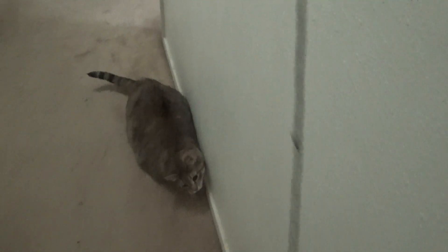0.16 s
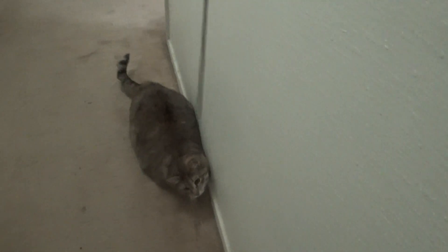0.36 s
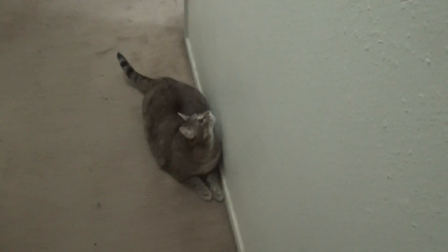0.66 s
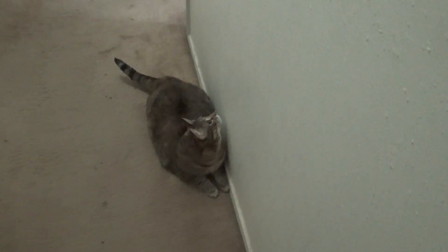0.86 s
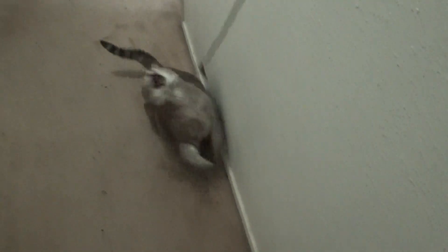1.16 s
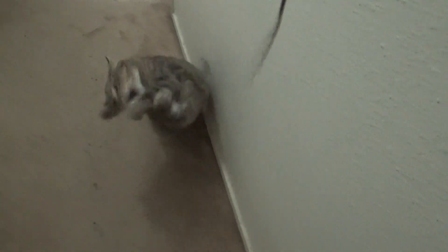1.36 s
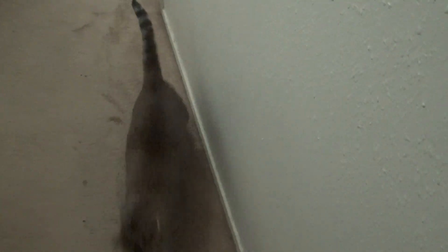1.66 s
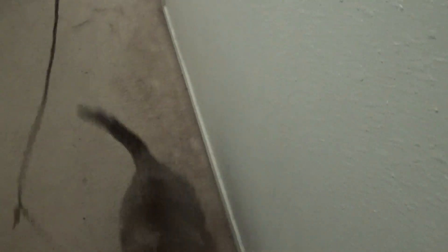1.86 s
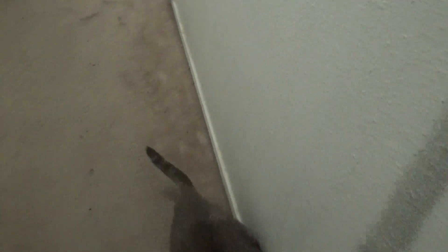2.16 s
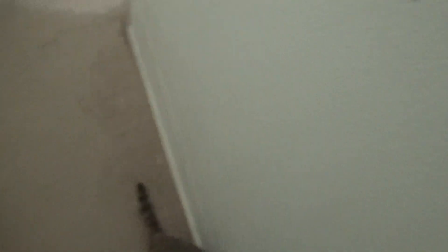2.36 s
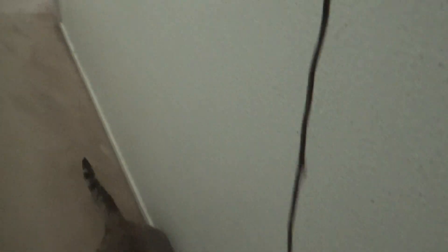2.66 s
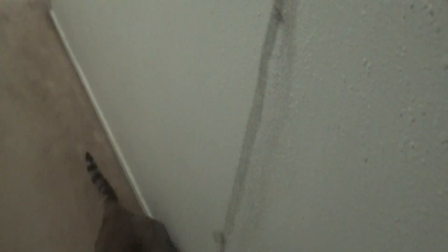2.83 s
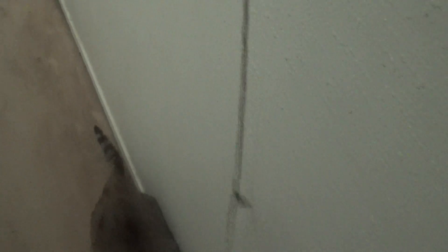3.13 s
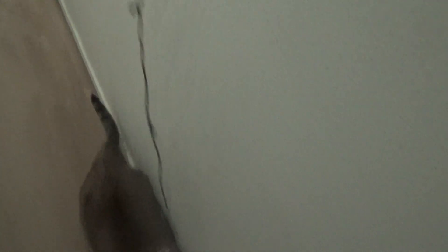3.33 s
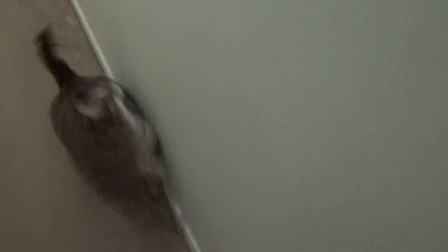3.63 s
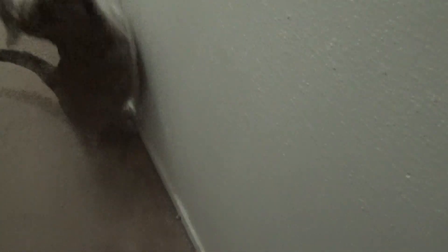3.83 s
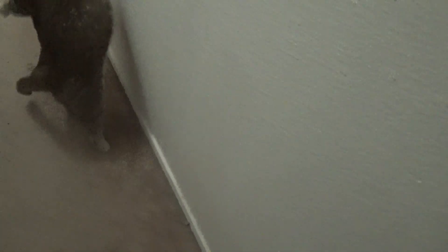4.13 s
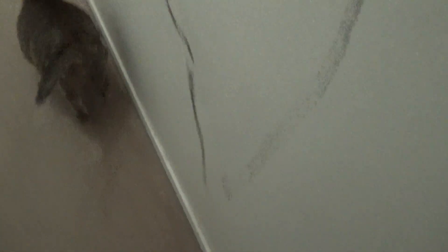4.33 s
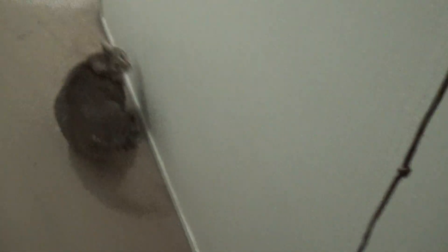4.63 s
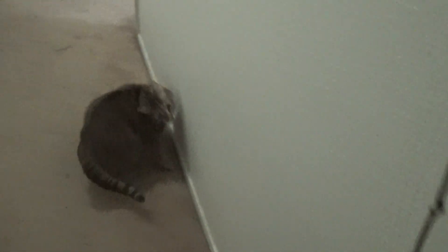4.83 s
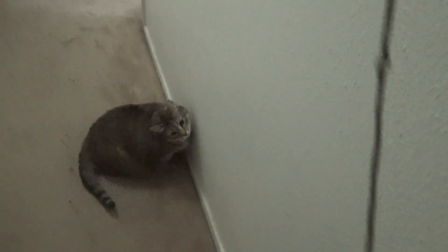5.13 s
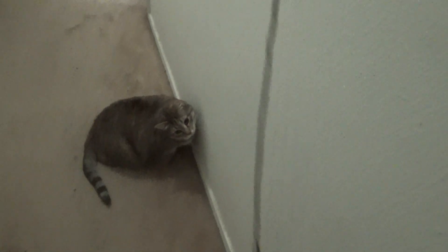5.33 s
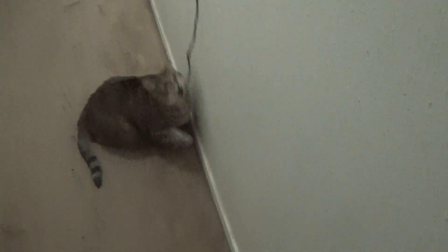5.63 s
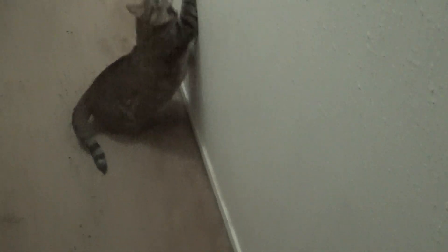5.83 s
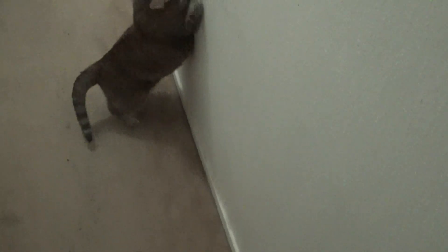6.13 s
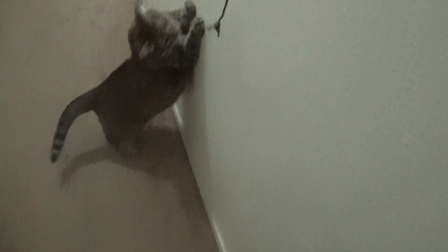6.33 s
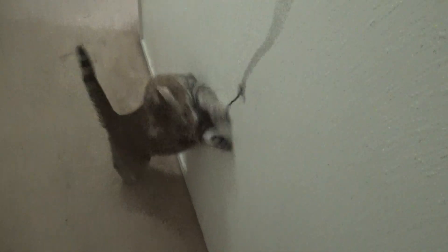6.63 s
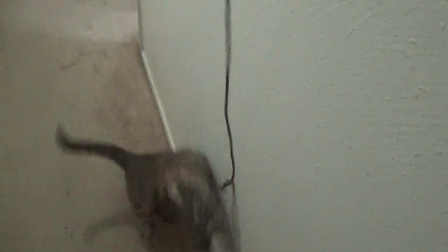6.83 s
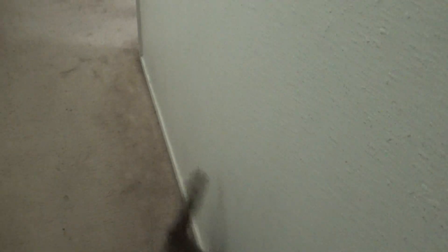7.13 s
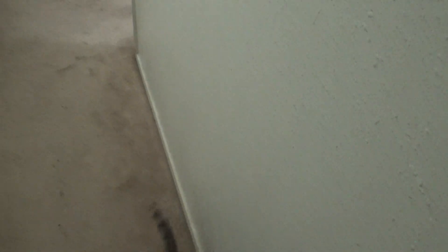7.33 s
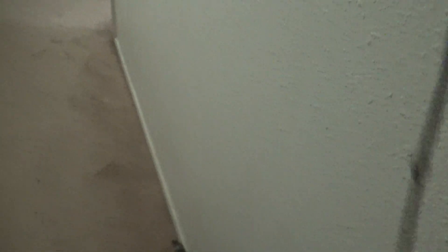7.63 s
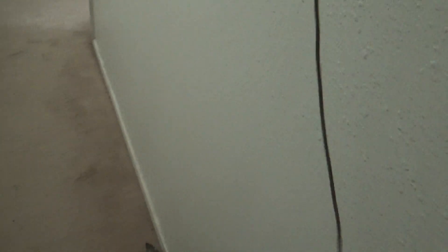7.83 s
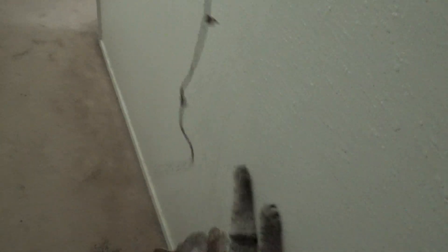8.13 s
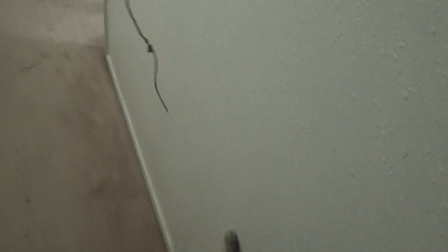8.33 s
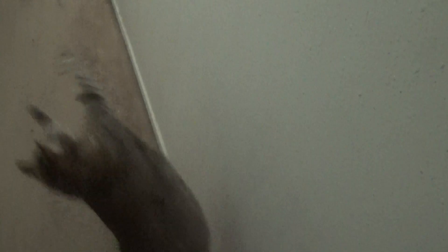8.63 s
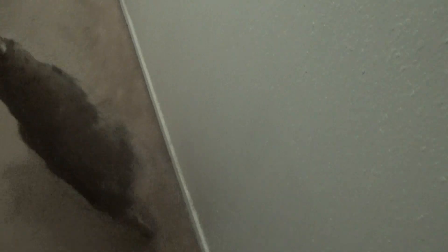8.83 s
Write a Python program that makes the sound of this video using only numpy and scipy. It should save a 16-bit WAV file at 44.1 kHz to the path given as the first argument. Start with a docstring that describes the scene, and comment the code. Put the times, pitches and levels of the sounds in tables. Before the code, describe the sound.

A steady soft draught, hiss and faint low mains hum fill a carpeted hallway, heard close in stereo. At 0.3 s a cord swishes barely audibly; around 1.1-2.0 s come faint fur rustles, a short breathy huff at 1.3, a soft step and claw ticks. A tap at 2.25 leads to a very sharp double slap on the hollow wall at 2.75 with a floor thump, then gritty scraping and scrabbling until 3.6. A heavy dull landing booms at 3.75, followed by brushing and smaller taps to 4.4. Quiet returns, with a faint rub and cord swish. A loud crisp slap hits at 5.84, then jerky scrapes, rustles and soft thuds until 7.0. After a lull, a swish at 7.8 precedes a hard smack and deep thump at 8.12, a lighter slap at 8.34, a dry claw click at 8.53, and a last fur brush and thud near 8.9.

```python
"""A cat pounces at a dangling cord in a carpeted hallway, close by, over a steady draught, mains hum and
hiss that last throughout. Noise excites damped resonances: paws slap and scrape the hollow wall, claws
tick, landings drum the floor boards, fur and cord brush, and the cat huffs once. The hallway answers with
a short tail of noise that decays at its own speed at each frequency.
"""
import sys
import numpy as np
from scipy import signal
from scipy.fft import rfft, irfft, next_fast_len
from scipy.io import wavfile
from scipy.ndimage import map_coordinates

SR = 44100
rng = np.random.default_rng(int(sys.argv[2]) if len(sys.argv) > 2 else 0)


def unload_wav(signal):
    """Save mono or channel-first audio to the path in sys.argv[1] as 16-bit WAV at rate SR, clipped to [-1, 1]."""
    wavfile.write(
        sys.argv[1],
        SR,
        np.round(np.clip(np.atleast_2d(signal).T, -1, 1) * 32767).astype(np.int16),
    )


N = 396018  # samples

# Spectral shape of draught and hiss: [f/Hz, relative level/dB per Hz]
AIR_SPECTRUM = [(13, -60), (22, 3.5), (125, -2), (169, -2.5), (263, -4), (444, -8), (672, -8.5), (910, -7),
                (1230, -11.5), (5460, -19), (9220, -16), (14700, -29), (16000, -31)]
# Left-right correlation of that noise before the stereo width is set: [f/Hz, correlation]
AIR_LIKENESS = [(60, 0.38), (240, 0.31), (950, 0.2), (3770, 0.76), (15000, 1)]
# Mains hum: [f/Hz, mid level/dB rms]
HUM = [(120, -68), (240, -81.5)]
# Fuzzy background bands that come and go: [f/Hz, width/Hz, relative level/dB]
FLICKER_BANDS = [(693, 200, 0), (920, 200, -1.5)]
# Paw slaps and claw taps: [t/s, body peak level/dB, bright part/dB and hollow part/dB re body, favoured f/Hz]
TAPS = [(0.212, -46, -15, -8, 1100), (1.336, -57, 16.5, -12, 3500), (1.631, -44.5, 4.5, -21, 3500),
        (2.252, -30.5, -1.5, -3, 3570), (2.4377, -35, -11, -7, 2670), (2.5113, -42.5, 5.5, -4, 1530),
        (2.628, -52.5, 9.5, -7, 2010), (2.7285, -39, -8, -11, 4040), (2.7443, -11.5, -17.5, -6.5, 2200),
        (2.7549, -17, -12, -5, 3400), (2.866, -30, -21, -16, 2980), (2.9388, -27.5, -6, -10, 2880),
        (3.5271, -37, -25, -12, 1946), (3.6305, -50, 3, 12, 1670), (3.7506, -38.5, -1, 11.5, 1610),
        (4.095, -28, -14, -6.5, 2570), (4.154, -36.5, -2, -10, 2380), (4.2351, -28, -9, -7.5, 2820),
        (4.4405, -45, -2, -8, 2060), (4.943, -44.5, 8, -16, 1600), (4.967, -45.5, 5, -3, 2000),
        (5.8369, -11, -18.5, -7, 2380), (5.8452, -12.5, -9, -5.5, 2070), (5.8603, -46, -11, -4, 2880),
        (6.9707, -46.5, 13.5, -5, 2480), (7.0204, -48.5, 8, 1, 1800), (7.0814, -36, -2.5, -1.5, 1900),
        (7.2677, -50.5, 1, 12.5, 1500), (7.929, -49, -8, 5.5, 1400), (8.1184, -14, -10, -10, 1810),
        (8.1284, -14, -33, -12, 4130), (8.3317, -32, -13, -8, 2410), (8.348, -28.5, -11, -29, 3180),
        (8.834, -37, 5.5, -6, 2170), (8.939, -50, 5, 8.5, 1500)]
# Painted wall under a paw: [f/Hz, width/Hz, level/dB]
WALL_MODES = [(1303, 330, 3), (1740, 300, 3), (2230, 650, -1), (2710, 320, 4), (3200, 530, -2),
              (4170, 320, 2), (4500, 3000, -5.5)]
# Hollow behind the wall: [f/Hz, width/Hz, level/dB]
HOLLOW_MODES = [(412, 240, -2.5), (714, 296, 1), (930, 425, -0.5)]
# Fur, cord and claw tips: [f/Hz, width/Hz, level/dB]
BRUSH_MODES = [(4100, 3900, -3), (7080, 780, 2), (8840, 1840, 1), (13000, 4800, -22)]
# Broad treble emphasis that follows the brush modes: [f/Hz, width/Hz, level/dB]
SOFT_MODES = [(7170, 6400, 0)]
# Decay of the hallway's answer: [f/Hz, t60/s]
HALL_DECAY = [(100, 0.54), (500, 0.34), (2000, 0.24), (10000, 0.2)]
# Cord swinging past: [start t/s, length/s, level/dB]
SWISHES = [(0.301, 0.36, -60.5), (1.42, 0.2, -61), (5.293, 0.39, -61), (7.754, 0.38, -53.5)]
# Paws dragging over wall (high f) and carpet (low f):
# [start t/s, length/s, loudest at share 0-1, scrape level/dB, favoured f/Hz, fur brush level/dB]
STROKES = [(1.075, 0.13, 0.3, -62.5, 2740, -60.5), (1.586, 0.2, 0.3, -66, 2700, -55.5),
           (1.856, 0.062, 0.44, -65, 1500, -62), (1.985, 0.031, 0.54, -60.5, 2020, -56),
           (2.403, 0.34, 0.17, -64.5, 2520, -70), (2.767, 0.32, 0, -46, 2930, -51.5),
           (2.987, 0.32, 0.63, -49, 2600, -55.5), (3.151, 0.071, 0.5, -43.5, 3000, -73),
           (3.203, 0.083, 0.86, -52, 2900, -57.5), (3.31, 0.19, 0.06, -61, 2800, -61.5),
           (3.397, 0.077, 0.57, -52, 2780, -63), (3.522, 0.05, 0.46, -50, 3600, -59.5),
           (3.55, 0.062, 0.4, -52, 3300, -58), (3.657, 0.32, 0.55, -57.5, 1930, -54.5),
           (3.86, 0.27, 0.45, -51.5, 1580, -51), (4.102, 0.28, 0.28, -60, 1490, -58.5),
           (4.34, 0.068, 0.1, -63, 2650, -57.5), (4.721, 0.37, 0.48, -62, 1480, -59),
           (5.882, 0.15, 0.2, -53.5, 1520, -54.5), (6.023, 0.13, 0, -47.5, 2675, -53),
           (6.051, 0.027, 0, -44.5, 2770, -71), (6.229, 0.18, 0.23, -46.5, 2640, -57),
           (6.351, 0.089, 0.67, -48, 2570, -54.5), (6.482, 0.11, 0.48, -43.5, 2880, -45),
           (6.6, 0.41, 0.08, -59.5, 2460, -54), (6.664, 0.056, 0.95, -47.5, 2630, -48.5),
           (6.802, 0.083, 0.3, -64, 1600, -58), (7.162, 0.036, 0.5, -59.5, 1280, -62.5),
           (8.137, 0.11, 0, -43.5, 2960, -48), (8.337, 0.087, 0.14, -44, 3150, -47.5),
           (8.593, 0.16, 0.23, -67, 2900, -64), (8.795, 0.048, 0.4, -59.5, 2470, -51.5),
           (8.834, 0.056, 0.4, -56.5, 2250, -42.5), (8.923, 0.056, 0.44, -61, 1500, -52)]
# The cat's short breathy huff: [start t/s, length/s, level/dB]
HUFF = (1.27, 0.23, -54)
# Resonances of its mouth: [f/Hz, width/Hz, level/dB]
MOUTH_MODES = [(332, 40, 2.5), (673, 64, -3.5), (960, 120, -4), (3240, 910, -10.5), (3600, 150, -8),
               (6450, 1400, -15)]
# Landings and heavy steps: [t/s, low-mode peak level/dB, upper modes/dB re low modes]
THUMPS = [(1.671, -44, -4.5), (1.879, -59.5, 10), (2.252, -53, 16.5), (2.438, -48, 0), (2.509, -48, -1),
          (2.75, -25.5, -0.5), (2.851, -37, -16), (2.945, -40.5, -3), (3.127, -38.5, -12),
          (3.195, -41.5, -5), (3.752, -21.5, -4.5), (4.075, -43.5, -1), (4.267, -42, -4), (4.509, -56, 4),
          (5.838, -39, 8.5), (6.05, -41, -4), (6.276, -52, 1), (6.379, -50, 4), (6.571, -40, 1),
          (6.648, -35.5, -6.5), (6.82, -45.5, -1.5), (7.017, -43.5, 0), (7.268, -58.5, 15.5),
          (7.909, -54.5, 7.5), (8.119, -17.5, -2.5), (8.344, -53, 0), (8.936, -31, 4)]
# Floor boards and wall panel, three groups: [f/Hz, width/Hz, level/dB]
DEEP_MODES = [(52, 24, -14.5), (89.6, 14, 1), (110, 17, -4), (125.3, 12.3, 0.5)]
LOW_MODES = [(159.1, 37.7, 0), (199.2, 25.6, 0.5)]
UPPER_MODES = [(230, 45, -1.5), (281, 26, 2.5), (340, 17, -2.5), (418, 40, -4), (470, 33, -4),
               (588, 38, -5.5)]
# Dry clicks of a single claw tip: [t/s, body peak level/dB, bright part/dB re body, favoured f/Hz]
TICKS = [(1.752, -45, 13.5, 3080), (1.765, -56, 13, 3000), (1.99, -45, 1, 2000), (2.017, -36, 5.5, 3030),
         (2.42, -49, -3, 2000), (7.951, -49, 14, 3000), (8.532, -24, -12, 3300), (8.635, -51, 7, 3000),
         (8.665, -57, 16, 3320)]
# Where the cat is: [t/s, left-right level/dB, deep modes of the floor there/dB re low modes]
PLACE = [(1.4, 1, -3), (2.3, -1, -20), (2.75, -1, 0), (3.0, -1, -19), (3.75, 1.5, -6.5), (4.5, 1, -22),
         (5.8, 1.5, 1.5), (6.8, -1, -1.5), (7.3, 2, -9), (8.1, -1.5, -12), (8.5, -2, 6), (8.9, 2.5, -14)]
# Gain on the left-right difference: [f/Hz, gain/dB]
DIFFERENCE_GAIN = [(40, -24), (150, -16), (400, -1.5), (9000, 5), (11500, -12.5)]

AIR_DB, FLICKER_DB = -58, -71.0
SWISH_TOP = 0.56  # share of the swing at which it is loudest
# The hollow part has this level under a scrape of -49.5 dB at 2700 Hz and follows the scrape's level
HOLLOW_DB, HOLLOW_DB_PER_DB, HOLLOW_DB_PER_OCTAVE = -52.5, 0.78, -3
RUMBLE_DB = -3.5  # shudder of the boards relative to the hollow part
SNAGS_PER_S, SNAG_DB = 110, 17.5  # claws catching within a stroke
JERK_DB, JERKS_PER_S = 1.03, 67.2  # a stroke moves in jerks
PUSH_S = 0.038  # time scale of the paws' pressing
SETTLE_S, SETTLE_SHARE = 0.01836, 1.13  # delay and strength of the body's weight following the paws
TICK_T60_S = 0.0095
TOP_HZ = 15900  # band limit of the camera


def amp(db):
    """Decibel law: amplitude gain of a level in dB."""
    return 10 ** (np.asarray(db) / 20)


def unit(x):
    """Power normalisation: x at rms 1."""
    return x / np.sqrt(np.mean(x ** 2) + 1e-20)


def peak(x):
    """Peak normalisation: x with its highest swing at 1."""
    return x / np.abs(x).max()


def along(points, hz):
    """Interpolation of (f, value) points on a logarithmic frequency axis."""
    f, value = np.transpose(points)
    return np.interp(np.log(hz + 1), np.log(f + 1), value)


def wobble(rate, n=N):
    """Slow random modulation: a smooth curve through random knots, rate of them a second."""
    knots = rng.standard_normal(int(n * rate / SR) + 4)
    return map_coordinates(knots, [np.arange(n) * rate / SR])


def filtered(x, response):
    """Linear filtering: the spectrum of x times a response of frequency."""
    n = x.shape[-1]
    m = next_fast_len(n + 8192)  # room for the ringing
    return irfft(rfft(x, m) * response(np.fft.rfftfreq(m, 1 / SR)), m)[..., :n]


def ring(x, modes):
    """Modal superposition: x drives damped resonances in parallel, with alternating sign."""
    def response(f):
        total = 0
        for k, (centre, width, db) in enumerate(modes):
            damping = 1j * f * width
            total = total + (-1) ** k * amp(db) * damping / (centre ** 2 - f ** 2 + damping)
        return total
    return filtered(x, response)


def brushed(x):
    """Resonances in cascade: x coloured by fine fibres and tips, then by a broad treble emphasis."""
    return ring(ring(x, BRUSH_MODES), SOFT_MODES)


def add(track, s, sound):
    """Superposition: mix a sound into the track at s seconds."""
    part = track[..., round(s * SR):][..., :sound.shape[-1]]
    part += sound[..., :part.shape[-1]]


def grit(n, rough_db):
    """Friction: noise whose strength flutters as fibres and paint grains catch and let go."""
    flutter = wobble(SR / 150, n)
    return amp(rough_db * flutter) * rng.standard_normal(n)


def swell(length, top):
    """Envelope of a stroke: sine-shaped rise to its loudest moment, then fall."""
    u = np.arange(round(length * SR)) / (length * SR)
    top = np.clip(top, .05, .95)
    return np.sin(np.pi / 2 * np.where(u < top, u / top, (1 - u) / (1 - top))) ** 1.32


def background():
    """Partly correlated stereo noise for draught and hiss, with hum of wavering level and phase."""
    def mid_side(hz):
        angle = np.arccos(np.clip(along(AIR_LIKENESS, hz), -1, 1)) / 2
        return amp(along(AIR_SPECTRUM, hz)) * [np.cos(angle), np.sin(angle)]
    mid, side = filtered(rng.standard_normal((2, N)), mid_side)
    air = amp(AIR_DB + 0.35 * wobble(3.036)) * unit(np.array([mid + side, mid - side]))
    t = np.arange(N) / SR
    hum = np.zeros(N)
    for hz, db in HUM:
        level = amp(db + 1.4 * wobble(9.9)) * np.sqrt(2)  # rms to peak
        hum += level * np.sin(2 * np.pi * hz * t + 0.83 * wobble(14))
    return air + hum + flicker()


def flicker():
    """Amplitude modulation of narrow-band noise: faint bands come and go, unalike at left and right."""
    def bands():
        total = np.zeros(N)
        for band in FLICKER_BANDS:
            noise = unit(ring(ring(rng.standard_normal(N), [band]), [band]))
            total += amp(6.5 * wobble(11.5)) * noise * amp(band[-1])
        return total
    ahead, across = bands(), bands()
    return amp(FLICKER_DB) * np.array([ahead + 0.19 * across, ahead - 0.17 * across])


def taps():
    """Impact excitation: a sharp crack and a dying rattle of the wall, longer for harder blows."""
    out, t = np.zeros(N), np.arange(SR // 5) / SR
    crack = amp(-60 * t / .007)

    def burst(t60):
        return grit(len(t), rough_db=3.5) * (crack + 0.63 * amp(-60 * t / t60))

    for s, db, bright_db, hollow_db, hz in TAPS:
        t60 = 0.068 * amp(0.075 * db)
        spot = [(hz, 1.12 * hz, 0)]  # the spot struck favours the modes near one pitch
        body = peak(ring(ring(ring(burst(t60), WALL_MODES), spot), spot))
        bright = amp(bright_db) * peak(brushed(burst(t60)))
        hollow = peak(ring(ring(burst(1.47 * t60), HOLLOW_MODES), [(690, 1040, 0)]))
        add(out, s, amp(db) * (body + bright + amp(hollow_db) * hollow))
    return out


def hall(x):
    """Reverberation: frequency-dependent decay of diffuse noise, a new tail for each stretch of sound."""
    out, hop = np.zeros((2, N)), SR // 4
    for start in range(0, N, hop):
        hz, t, z = signal.stft(rng.standard_normal((2, SR // 3)), SR, nperseg=256)
        decay = amp(-60 * t / along(HALL_DECAY, hz)[:, None])
        ahead, across = signal.istft(z * decay, SR, nperseg=256)[1]
        tail = np.array([ahead + 0.27 * across, ahead - 0.57 * across]) / np.linalg.norm(ahead)
        answer = signal.fftconvolve(x[None, start:start + hop], tail, axes=1)
        add(out, start / SR + .004, answer)  # 4 ms late
    return out


def swishes():
    """Broadband friction noise: the cord hisses through the air and along the wall."""
    out = np.zeros(N)
    for s, length, db in SWISHES:
        shape = swell(length, SWISH_TOP)
        hiss = unit(brushed(grit(len(shape), rough_db=2.5)))
        add(out, s, amp(db) * shape * hiss)
    return out


def scuffle():
    """Sliding friction drives wall, hollow and boards while fur brushes along; one huff is added."""
    out = np.zeros(N)
    for s, length, top, scrape_db, hz, brush_db in STROKES:
        shape = swell(length, top)
        n = len(shape)
        shape = shape * amp(JERK_DB * wobble(JERKS_PER_S, n))
        snags = amp(SNAG_DB) * rng.standard_normal(n) * (rng.random(n) < SNAGS_PER_S / SR)

        focus = [(hz, 1.63 * hz, 0)]
        scrape = ring(grit(n, rough_db=2.5) + snags, WALL_MODES)
        scrape = ring(ring(scrape, focus), focus)
        scrape = scrape + amp(-5) * ring(scrape, [(hz, 0.25 * hz, 0)])  # the patch rubbed sings out
        brush = brushed(grit(n, rough_db=2.5) + snags)
        hollow = ring(grit(n, rough_db=0.5), HOLLOW_MODES)
        shudder = ring(rng.standard_normal(n), DEEP_MODES + LOW_MODES + UPPER_MODES[:3])

        hollow_db = HOLLOW_DB + HOLLOW_DB_PER_DB * (scrape_db + 49.5)
        hollow_db += HOLLOW_DB_PER_OCTAVE * np.log2(hz / 2700)
        stroke = amp(scrape_db) * unit(scrape) + amp(brush_db) * unit(brush)
        stroke += amp(hollow_db) * unit(hollow) + amp(hollow_db + RUMBLE_DB) * unit(shudder)
        add(out, s, shape * stroke)
    add_huff(out)
    return out


def add_huff(out):
    """Source and filter: turbulent breath noise excites the resonances of the mouth."""
    s, length, db = HUFF
    shape = swell(length, 0.17) ** 0.31
    breath = unit(ring(grit(len(shape), rough_db=2.0), MOUTH_MODES))
    add(out, s, amp(db) * shape * breath)


def thumps(deep_db):
    """Forced vibration: a soft, uneven push rings the boards; first contact knocks the upper modes."""
    out, t = np.zeros(N), np.arange(SR // 3) / SR
    for s, db, upper_db in THUMPS:
        uneven = rng.standard_normal(len(t)) * (t / PUSH_S) * np.exp(-2.5 * t / PUSH_S)
        force = np.exp(-t / 0.00062) * 3 + uneven * 3
        add(force, SETTLE_S, SETTLE_SHARE * force.copy())
        knock = np.exp(-t / 0.00052) * 3.7 + uneven * 12
        low = peak(ring(force, LOW_MODES))
        deep = amp(deep_db[round(s * SR)]) * peak(ring(force, DEEP_MODES))
        upper = amp(upper_db) * peak(ring(knock, UPPER_MODES))
        add(out, s, amp(db) * (low + deep + upper))
    return out


def ticks():
    """Impulsive release: a claw tip snaps off the paint, a crack with no rattle."""
    out, t = np.zeros(N), np.arange(SR // 20) / SR
    for s, db, bright_db, hz in TICKS:
        body, bright = amp(-60 * t / TICK_T60_S) * rng.standard_normal((2, len(t)))
        spot = [(hz, 0.43 * hz, 0)]
        body = peak(ring(ring(body, spot), spot))
        bright = amp(bright_db) * peak(brushed(bright))
        add(out, s, amp(db) * (body + bright))
    return out


def place():
    """Level-difference panning: left and right gain, and the floor's deep-mode level, at each moment."""
    s, pan_db, deep_db = np.transpose(PLACE)
    t = np.arange(N) / SR
    sides = amp(np.interp(t, s, pan_db) * [[.5], [-.5]])
    return sides, np.interp(t, s, deep_db)


def scene():
    """Superposition of direct sound, the hallway's answer and the background."""
    sides, deep_db = place()
    near = taps() + swishes() + scuffle() + thumps(deep_db)
    claws = ticks()
    answer = amp(-8) * hall(near + 0.78 * claws)
    return background() + (near + claws) * sides + answer


def record(dry):
    """Stereo width by frequency: bass and top treble nearly alike at left and right; sharp band limit."""
    mid = dry.mean(axis=0)
    side = filtered((dry[0] - dry[1]) / 2, lambda hz: amp(along(DIFFERENCE_GAIN, hz)))
    return filtered(np.array([mid + side, mid - side]), lambda hz: hz < TOP_HZ)


dry = scene()
out = record(dry)
unload_wav(out)
```